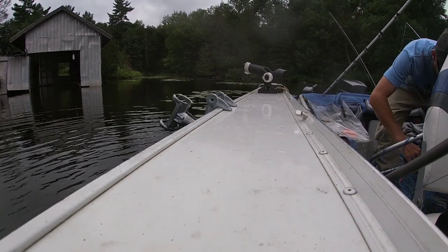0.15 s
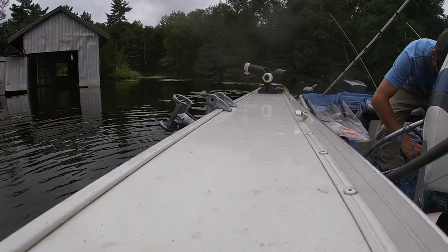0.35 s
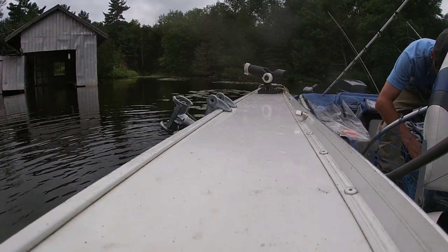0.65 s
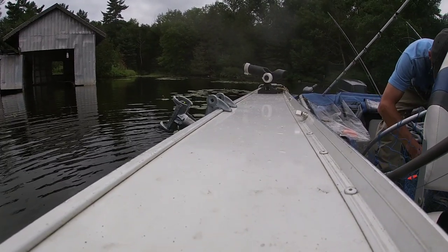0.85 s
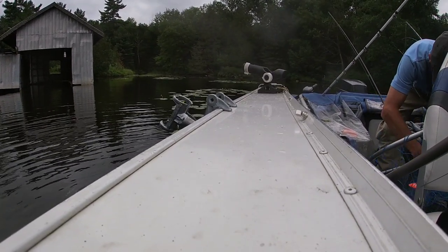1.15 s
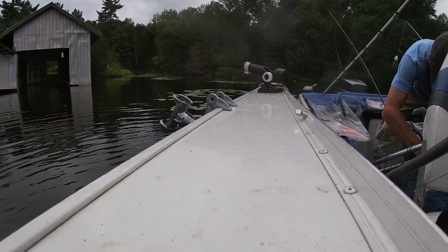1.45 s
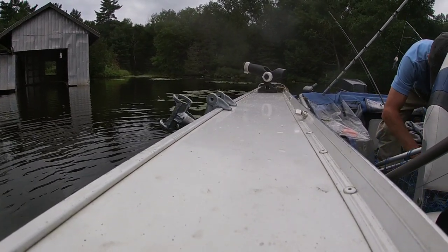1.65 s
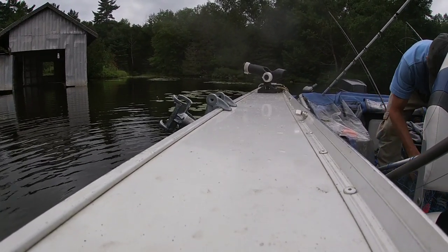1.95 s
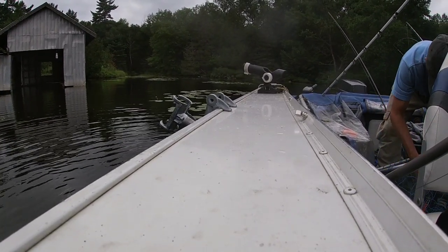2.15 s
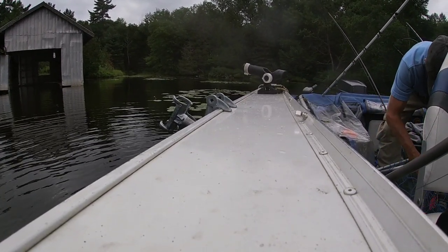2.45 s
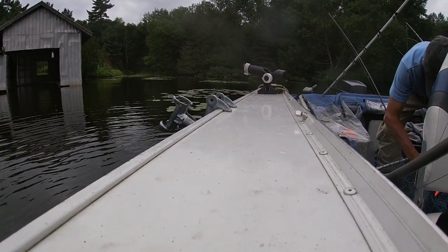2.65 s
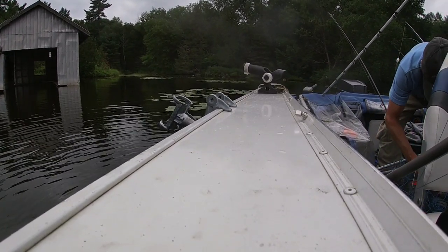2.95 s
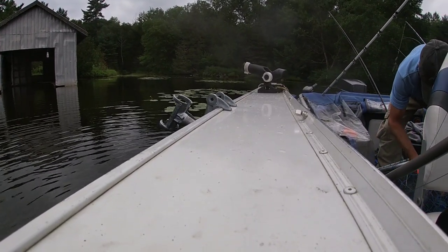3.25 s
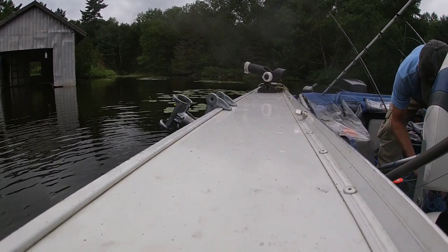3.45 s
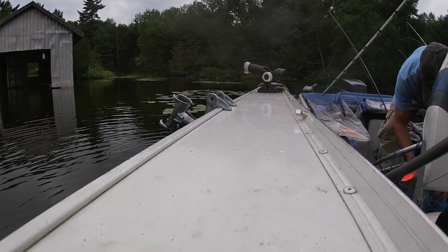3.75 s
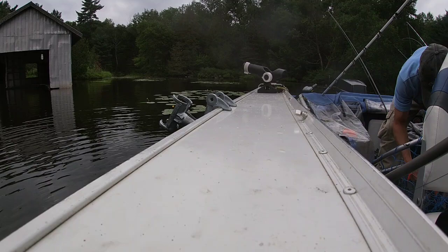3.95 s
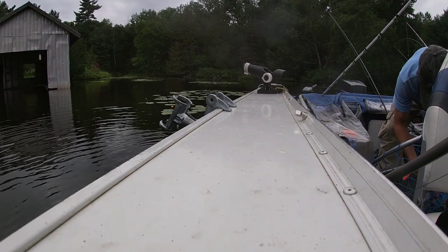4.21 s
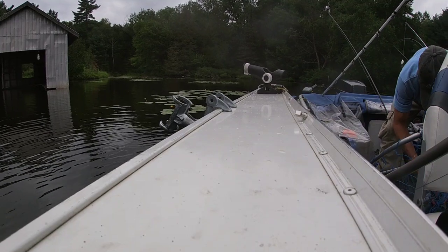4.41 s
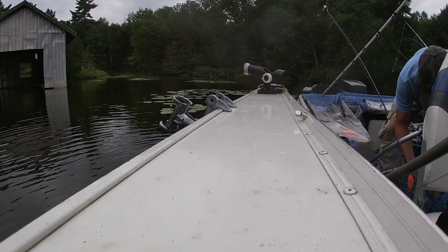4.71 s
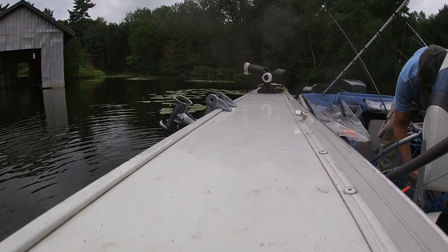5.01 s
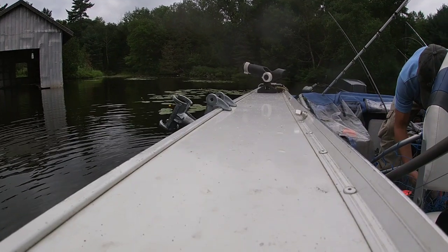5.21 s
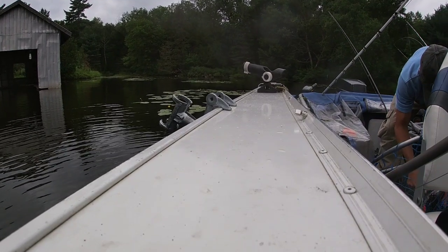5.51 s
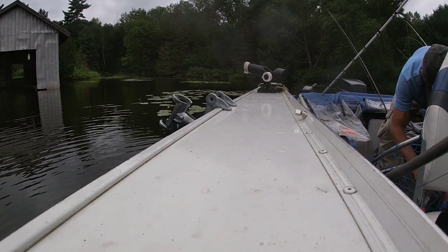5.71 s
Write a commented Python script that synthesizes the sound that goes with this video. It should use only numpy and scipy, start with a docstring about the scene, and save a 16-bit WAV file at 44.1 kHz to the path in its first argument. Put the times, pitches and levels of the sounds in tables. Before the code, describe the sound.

Heavy gear bangs and rattles on an aluminium boat hull, then sparse ring clinks, clamp clacks and soft thuds over a faint motor hum.

```python
"""On the floor of an aluminium boat on a calm river, fishing gear is handled.
Heavy pieces knock, drag and rattle on ringing hull panels; a pole slides as a light rasp of coloured noise.
Small rings clink and clamps clack on high metal modes; feet and soft loads thud as swelling low sines.
An electric trolling motor hums on its shaft orders and ticks faintly, under steady open-air noise."""
import sys
import numpy as np
from scipy import signal
from scipy.fft import rfft, irfft, next_fast_len
from scipy.io import wavfile
from scipy.ndimage import uniform_filter1d

SR = 44100
rng = np.random.default_rng(int(sys.argv[2]) if len(sys.argv) > 2 else 0)


def bounce(signal):
    """Save signal as a 16-bit WAV file at the path given by the first command-line argument."""
    frames = np.transpose(np.atleast_2d(signal))
    limited = np.clip(frames, -1, 1)
    pcm = np.round(limited * 32767).astype(np.int16)
    wavfile.write(sys.argv[1], SR, pcm)


N = 258867
TIME = np.arange(N) / SR
BLOW_TIME = TIME[:SR // 3]  # room for one blow and its tail

# Gear striking the hull: (time [s], relative level [dB], hardness [dB], weight [dB],
# favoured ring [Hz], clatter t60 [s])
HULL_KNOCKS = [(0.0708, -24, -6, -36, 744, 0.03), (0.122, -36, -5.5, 6, 428, 0.04),
               (0.238, -29.5, -26, 5, 600, 0.094), (0.281, -10.5, -24, 7.5, 598, 0.061),
               (0.295, -7.5, -2.5, -10.5, 677, 0.035), (0.332, -12, -8, -9.5, 662, 0.021),
               (0.363, -18.5, -28, 5, 387, 0.15), (0.4527, -26, -8, 10, 620, 0.12),
               (0.4783, -9.5, -2, 4.5, 700, 0.045), (0.503, -11.5, -10.5, 4.5, 573, 0.09),
               (0.5448, -19, -6.5, 6, 703, 0.081), (0.677, -13.5, -14.5, 4, 387, 0.032),
               (1.076, -43, 2.5, 3, 300, 0.037), (5.0626, -24, 4.5, 4, 1170, 0.034),
               (5.1175, -40, 4, 14.5, 870, 0.044), (5.698, -38.5, -30, 8, 547, 0.035),
               (5.714, -32.5, -27, 6.5, 550, 0.021), (5.749, -31, -25, 3.5, 504, 0.17),
               (5.801, -38, -21, 12, 370, 0.026)]
# Hull and deck panel modes: (frequency [Hz], width [Hz], relative level [dB])
HULL_MODES = [(66.6, 11, -10), (172, 32.4, -1), (224, 25, -1), (258.6, 64, -6), (345.6, 14, 3),
              (389, 35, 3), (504.7, 21, -1.5), (596, 47, -2), (657, 37, 0.5), (671.7, 48, 0), (753, 19, -8),
              (882, 21, -12), (1093, 166, -10.5), (1450, 73, -2.5), (1625, 59, -2), (1625, 42, -8),
              (1685, 84, -14), (1797, 74, -3), (1915, 86, -10), (2317, 38, -6.5), (2360, 110, -15),
              (2793, 72, -13), (2900, 55, -38), (3447, 48, -12), (3850, 87, -19), (4980, 340, -20),
              (5380, 210, -15.5), (7000, 210, -26)]
# Hull registers, boom, body, clang and crack: (low edge [Hz], high edge [Hz])
KNOCK_REGISTERS = [(50, 250), (250, 900), (900, 3200), (3200, 15000)]
# How each hull register answers: (relative level [dB], share of hardness [dB/dB], share of weight [dB/dB])
KNOCK_ANSWER = [(-11, 0.0096, 0.99), (0.5, 0, 0), (0, 0.99, 0), (-13, 0.66, 0.5)]
# Gear dragged over the floor: (start [s], length [s], level [dB])
DRAG_STROKES = [(0.268, 0.092, -24.5), (0.478, 0.079, -30.5), (0.63, 0.045, -41.5), (5.70, 0.069, -44)]
# Pole sliding along other gear: (start [s], length [s], level at the start [dB])
POLE_STROKES = [(0.952, 0.066, -41), (1.034, 0.019, -42.5)]
# Colour of the pole's rasp: (frequency [Hz], relative level [dB])
POLE_COLOUR = [(900, -26), (1500, -13), (1950, -2), (2600, -10.5), (3300, -9), (4500, -15), (6300, -16),
               (7800, -25), (9500, -21), (11500, -38), (15000, -41)]
# Clamps and pole joints snapping: (time [s], relative level [dB], brightness [dB], chatter t60 [s])
CLAMP_SNAPS = [(0.745, -43, -12, 0.05), (0.993, -42, 6.5, 0.041), (1.401, -49.5, -1, 0.2),
               (2.723, -46, -7, 0.032), (2.968, -48, 1, 0.077), (3.565, -48, -10, 0.21),
               (4.128, -40.5, -3, 0.063), (4.264, -35, 2, 0.057), (4.4198, -25, 3.5, 0.043),
               (4.49, -44, 3.5, 0.11), (4.548, -48, 1, 0.14), (4.709, -28, -2.5, 0.05),
               (4.848, -39, 1.5, 0.065), (4.899, -39, 7, 0.054), (5.041, -36, -20, 0.053)]
# Clamp and joint modes: (frequency [Hz], width [Hz], relative level [dB])
CLAMP_MODES = [(1800, 90, -16), (2420, 39, -7.5), (3420, 45, -7), (3840, 170, -3), (4820, 160, -7.5),
               (5510, 110, -2.5), (6140, 61, -7), (7170, 62, -7), (9050, 68, 10.5), (9940, 84, 23),
               (10350, 33, -28), (12430, 120, 5), (13070, 280, 7.5), (14100, 110, -20)]
# Clamp registers, middle, low, high and top: (low edge [Hz], high edge [Hz])
CLACK_REGISTERS = [(3500, 7500), (1600, 3500), (7500, 11500), (11500, 14500)]
# How each clamp register answers: (relative level [dB], share of brightness [dB/dB])
CLACK_ANSWER = [(0.5, 0.05), (-10.5, 0.05), (-4, 0), (-12, 1.35)]
# Small metal rings touching: (time [s], relative level [dB], brightness [dB])
RING_TOUCHES = [(0.002, -36, 0.5), (0.034, -41.5, 3.5), (0.056, -40, -0.5), (1.332, -46.5, 2),
                (1.641, -40, 2), (1.677, -35, 3.5), (1.716, -44.5, 3), (1.753, -42, -5),
                (1.772, -37.5, 3.5), (1.943, -48, -3), (2.407, -52, 2), (2.625, -48.5, 1), (2.693, -43, -5),
                (3.175, -31.5, 3), (3.234, -49, -1), (3.952, -52.5, 4), (4.268, -34.5, 4.5),
                (4.803, -41.5, 6), (5.068, -37, -6), (5.166, -51, 6.5), (5.589, -31.5, -6),
                (5.769, -35, -14)]
# Nominal pitches of the ring modes: (frequency [Hz])
RING_PITCHES = [4500, 5440, 5650, 7680, 7870, 8840, 9800, 10215, 12900, 13800, 14200]
# Damping and strength of the ring modes, in the same order: (width [Hz], relative level [dB])
RING_MODES = [(300, -28.5), (53, 1), (150, -15.5), (85, -10.5), (95, -17), (70, -22), (55, -1), (50, 2.5),
              (90, -10), (45, 3), (40, -9)]
# The ring mode that goes on singing: (frequency [Hz], width [Hz], relative level [dB])
SINGING_MODE = [(5441, 5, -1)]
# Ring registers, from the low mode to the top: (low edge [Hz], high edge [Hz])
CLINK_REGISTERS = [(4000, 6500), (6500, 8800), (8800, 11500), (11500, 15500)]
# How each ring register answers: (relative level [dB], share of brightness [dB/dB])
CLINK_ANSWER = [(0, 0), (-6.5, 0.62), (-9, 1.6), (-25, 1.1)]
# Feet and soft loads on the floor: (time [s], envelope peak [dB], frequency [Hz])
FLOOR_THUDS = [(0.150, -34.5, 173), (0.634, -24.5, 165), (1.077, -23.5, 161), (1.078, -29.5, 60),
               (1.106, -26.5, 163), (1.278, -27.5, 163), (1.481, -23, 65.6), (1.513, -26.5, 82.6),
               (1.55, -29, 56.4), (3.247, -27, 160), (3.445, -28.5, 164), (3.618, -35, 166),
               (4.314, -30, 184.4), (4.43, -35, 164), (5.251, -35.5, 164), (5.746, -26.5, 79)]
# Motor shaft orders: (multiple of the shaft rate, level [dB])
SHAFT_ORDERS = [(1, -73), (4, -71.5), (5, -55)]
# Faint motor casing tones: (frequency [Hz], width [Hz], relative level [dB])
CASING_MODES = [(630, 31, 2), (784, 8.1, 20.5), (860, 20, -5), (1214, 11, -8), (1343, 94, 9.5),
                (2060, 50, -40.5), (2780, 110, -2), (2940, 40, -14), (5490, 270, -9), (5070, 350, 2.5),
                (9500, 1000, -56.5)]
# Colour of the open-air bed: (frequency [Hz], relative level per Hz [dB])
AIR_COLOUR = [(12, -21), (20, -2), (64, -5), (82, -19), (151, 1.5), (199, -6.5), (319, -11), (409, -14.5),
              (796, -16), (2160, -24.5), (4430, -27.5), (5530, -25), (7300, -32), (9370, -35.5),
              (15000, -60)]
# Course of the open-air bed, before its overall lift: (time [s], level [dB])
AIR_COURSE = [(0.8, -51), (2.04, -53), (3.95, -53), (4.17, -52.5), (5.68, -55)]


def knocks(click_db=19, crack_db=-16, favour_width_hz=45, rebound_s=0.0165, rebound_loss_db=16):
    """Heavy gear strikes the hull and drops back once; each spot favours one ring over the panel modes."""
    out = np.zeros(N)
    for s, db, hardness_db, weight_db, ring_hz, t60 in HULL_KNOCKS:
        ring_db = 6 - 0.33 * hardness_db  # a soft blow brings out its one ring more
        for delay, loss_db in [(0, 0), (rebound_s, rebound_loss_db)]:
            force = contact(t60, swell_s=0.00088, tail_db=-22.5, tail_t60=0.22, grain_db=2.5)
            force[0] += from_db(click_db)  # the first touch
            panels = resonate(force, HULL_MODES)
            ring = resonate(force, [(ring_hz, favour_width_hz, ring_db)])
            # many dense, quickly damped modes heard as one broad resonance
            crack = lowpass(resonate(force, [(2190, 2200, crack_db)]), 8500, order=2)
            levels_db = registers(KNOCK_ANSWER, db - loss_db, hardness_db, weight_db)
            add(out, s + delay, weigh(panels + ring + crack, KNOCK_REGISTERS, levels_db))
    return out


def friction(drag_hz=850, drag_rough_db=4, slide_rough_db=1.0):
    """Uneven slips: a dull judder through the hull, and the light rasp of the pole."""
    slips = rng.standard_normal(N) * from_db(drag_rough_db * drift(180))
    drag = rms_one(lowpass(resonate(slips, HULL_MODES), drag_hz, order=2))
    rasp = rms_one(coloured(POLE_COLOUR) * from_db(slide_rough_db * drift(600)))
    # the pole is pressed harder as each push goes on
    sliding = strokes(POLE_STROKES, rise_db_per_s=336, build_db_per_s=104, fall_db_per_s=800)
    return dragging() * drag + sliding * rasp


def rattle(gain_db=-13, per_s=500, spread_db=5):
    """Loose parts of the dragged gear chatter on the upper panel modes in random touches."""
    touched = rng.random(N) < per_s / SR
    direction = np.sign(rng.standard_normal(N))
    strength = from_db(spread_db * np.tanh(rng.standard_normal(N)))
    upper = [mode for mode in HULL_MODES if mode[0] > 1000]
    return from_db(gain_db) * dragging() * rms_one(resonate(touched * direction * strength, upper))


def dragging():
    """Pressure of the dragged gear, as a gain in time."""
    return strokes(DRAG_STROKES, rise_db_per_s=334, build_db_per_s=0, fall_db_per_s=260)


def clacks(gain_db=2.0, click_db=12, snap_db=-14):
    """Held metal parts snap together: many damped modes and a bright burst."""
    out = np.zeros(N)
    for s, db, bright_db, t60 in CLAMP_SNAPS:
        force = contact(t60, swell_s=0.0019, tail_db=-35.5, tail_t60=0.83, grain_db=4.0)
        force[0] += from_db(click_db)  # the first touch
        sound = resonate(force, CLAMP_MODES) + from_db(snap_db) * force
        add(out, s, weigh(sound, CLACK_REGISTERS, registers(CLACK_ANSWER, db, bright_db)))
    return from_db(gain_db) * out


def clinks(touches, tick_db=-26, tick_per_brightness=0.7, detune=0.0046):
    """Small rings of slightly unequal size graze each other: they swell briefly and sing on high modes."""
    out = np.zeros(N)
    for s, db, bright_db in touches:
        force = contact(t60=0.08, swell_s=0.0013, tail_db=-36, tail_t60=0.2, grain_db=-0.5)
        modes = [(hz * (1 + detune * rng.standard_normal()), width, mode_db)
                 for hz, (width, mode_db) in zip(RING_PITCHES, RING_MODES)]
        singing = resonate(force, modes) - resonate(force, SINGING_MODE)
        # bright touches rattle, dull ones ring almost purely
        tick = from_db(tick_db + tick_per_brightness * bright_db) * force
        add(out, s, weigh(singing + tick, CLINK_REGISTERS, registers(CLINK_ANSWER, db, bright_db)))
    return out


def stirs(per_s=2.7, mean_db=-51, spread_db=3):
    """Dangling rings brush each other faintly at random: (time [s], level [dB], brightness [dB])."""
    draws = rng.random((40, 2))
    times = np.cumsum(.5 + draws[:, 0]) / per_s
    levels_db = mean_db + spread_db * (2 * draws[:, 1] - 1)
    return [(s, db, 0) for s, db in zip(times, levels_db) if s < TIME[-1]]


def thuds(swell_s=0.012):
    """A soft load swells into one low floor mode, which the water damps."""
    out = np.zeros(N)
    age = BLOW_TIME / swell_s
    envelope = (age * np.exp(1 - age)) ** 2.37  # reaches one at swell_s
    for s, db, hz in FLOOR_THUDS:
        add(out, s, from_db(db) * envelope * np.sin(2 * np.pi * hz * BLOW_TIME))
    return out


def motor(shaft_hz=29.34, hum_waver_db=6.0, whine_db=-61, tick_db=-61, tick_spread_db=4.5, tick_s=0.0039):
    """Low shaft orders, noise-driven casing tones, and an uneven brush tick on every turn."""
    turns = np.cumsum(shaft_hz * (1 + 0.04 * drift(25))) / SR
    hum = 0
    for order, db in SHAFT_ORDERS:
        wavering = np.sin(2 * np.pi * order * turns) * from_db(hum_waver_db * drift(22))
        hum = hum + from_db(db) * rms_one(wavering)
    whine = from_db(whine_db) * rms_one(resonate(rng.standard_normal(N), CASING_MODES))
    since_tick = ((turns + 0.025 * drift(19)) % 1) / shaft_hz  # s, with uneven timing
    strength = from_db(tick_spread_db * np.tanh(drift(29.7)))
    sparks = rng.standard_normal(N) * np.exp(-since_tick / tick_s) * strength
    ticks = rms_one(resonate(sparks, [(5730, 500, -3), (7450, 350, -11), (9920, 270, -8.5)]))
    return hum + whine + from_db(tick_db) * lowpass(ticks, 9660, order=4)


def open_air(lift_db=7.0, top_hz=13500):
    """Steady coloured noise with a slowly changing level is the bed behind the boat."""
    return from_db(lift_db) * level(AIR_COURSE) * lowpass(coloured(AIR_COLOUR), top_hz, order=8)


def contact(t60, swell_s, tail_db, tail_t60, grain_db):
    """Uneven micro-bounces and reflections between the hull sides, then a faint tail."""
    size = len(BLOW_TIME)
    fade = from_db(-60 * BLOW_TIME / t60) + from_db(tail_db - 60 * BLOW_TIME / tail_t60)
    unevenness = rms_one(lowpass(rng.standard_normal(size), 770, order=2))
    bounces = rms_one(from_db(grain_db * unevenness))
    return rng.standard_normal(size) * bounces * fade * (1 - np.exp(-BLOW_TIME / swell_s))


def registers(response, db, *manner):
    """Level of each register from a blow's strength and the manner in which it lands."""
    response = np.array(response)
    return db + response[:, 0] + response[:, 1:] @ np.array(manner)


def weigh(sound, bands_hz, levels_db):
    """Where a blow lands decides how much each register takes: dB over its loudest 10 ms."""
    out = 0
    for edges, db in zip(bands_hz, levels_db):
        band = signal.sosfilt(signal.butter(3, edges, "band", fs=SR, output="sos"), sound)
        loudest = np.sqrt(uniform_filter1d(band ** 2, size=SR // 100).max())
        out = out + from_db(db) * band / loudest
    return out


def resonate(x, modes):
    """Parallel two-pole resonances of (frequency [Hz], width [Hz], level [dB]), signs alternating."""
    out = 0
    for k, (hz, width, db) in enumerate(modes):
        r = np.exp(-np.pi * width / SR)  # a wider mode dies sooner
        poles = [1, -2 * r * np.cos(2 * np.pi * hz / SR), r * r]
        ringing = signal.lfilter([1, 0, -1], poles, x + 1e-18)
        out = out + (-1) ** k * from_db(db) * (1 - r * r) / 2 * ringing
    return out


def strokes(rows, rise_db_per_s, build_db_per_s, fall_db_per_s):
    """Gain of pushes (start [s], length [s], level [dB]): each sets in, holds or builds, and lets go."""
    gain = 0
    for start, length, db in rows:
        age = TIME - start
        attack = rise_db_per_s * np.minimum(age, 0)
        hold = build_db_per_s * np.clip(age, 0, length)
        release = -fall_db_per_s * np.maximum(age - length, 0)
        gain = np.maximum(gain, from_db(db + attack + hold + release))
    return gain


def coloured(points):
    """Steady unit-power noise shaped through points of (frequency [Hz], level [dB])."""
    hz, db = np.transpose(points)
    size = next_fast_len(N)
    bins = np.maximum(np.fft.rfftfreq(size, 1 / SR), 1)
    shape = from_db(np.interp(np.log(bins), np.log(hz), db))
    return rms_one(irfft(rfft(rng.standard_normal(size)) * shape, size)[:N])


def drift(per_s):
    """Random wander of unit power, with straight lines between per_s new values a second."""
    knots = rng.standard_normal(4096)
    return rms_one(np.interp(TIME * per_s, np.arange(len(knots)), knots))


def lowpass(x, hz, order):
    """Butterworth low-pass."""
    return signal.sosfilt(signal.butter(order, hz, fs=SR, output="sos"), x)


def level(rows):
    """Gain in time through points of (time [s], level [dB])."""
    return from_db(np.interp(TIME, *np.transpose(rows)))


def from_db(db):
    """Decibels to amplitude."""
    return 10 ** (np.asarray(db) / 20)


def rms_one(x):
    """Scale to unit power."""
    return x / np.sqrt(np.mean(x ** 2) + 1e-20)


def add(out, s, sound):
    """Mix a sound in at time s."""
    start = max(0, round(s * SR))
    out[start:start + len(sound)] += sound[:N - start]


def scene():
    """Everything reaches the deck as one centred sound."""
    gear = knocks() + friction() + rattle() + clacks() + clinks(RING_TOUCHES + stirs())
    boat = gear + thuds() + motor() + open_air()
    return np.array([boat, boat])


def record(dry):
    """The loudest peaks are rounded and the top is cut."""
    rounded = 1.208 * np.tanh(dry / 1.398)
    return signal.sosfilt(signal.ellip(10, .2, 90, 15200, fs=SR, output="sos"), rounded)


dry = scene()
out = record(dry)
bounce(out)
```